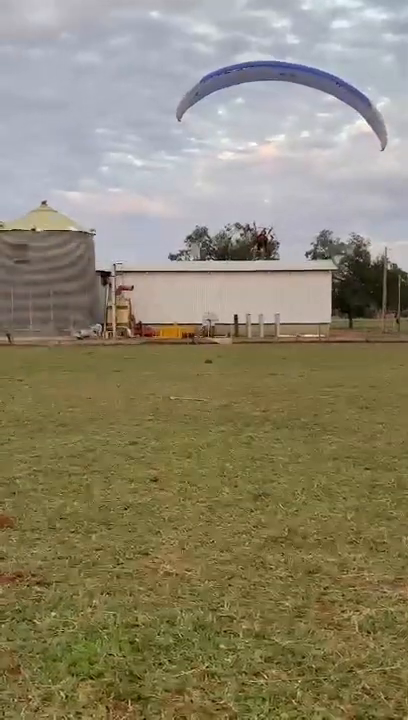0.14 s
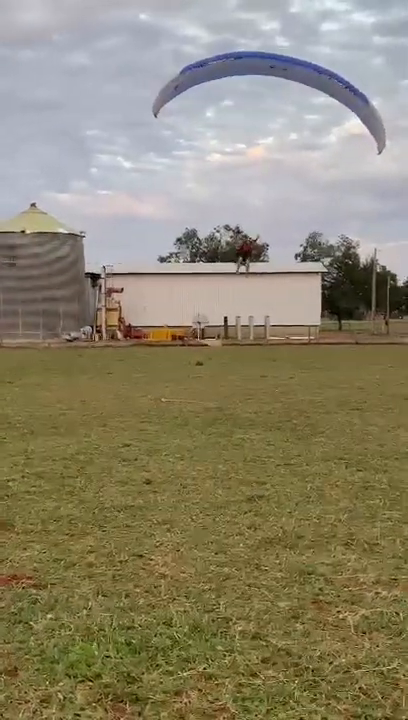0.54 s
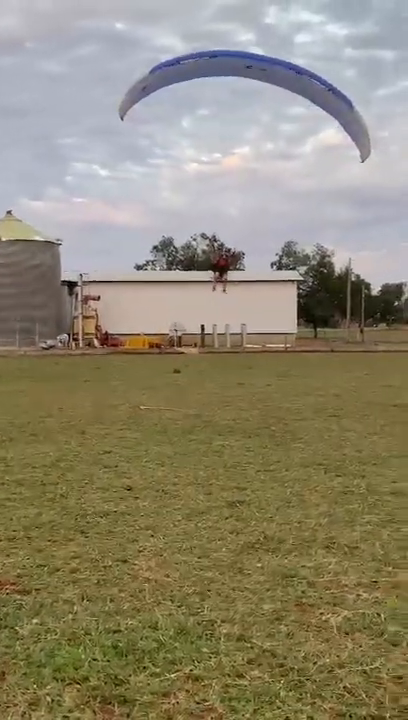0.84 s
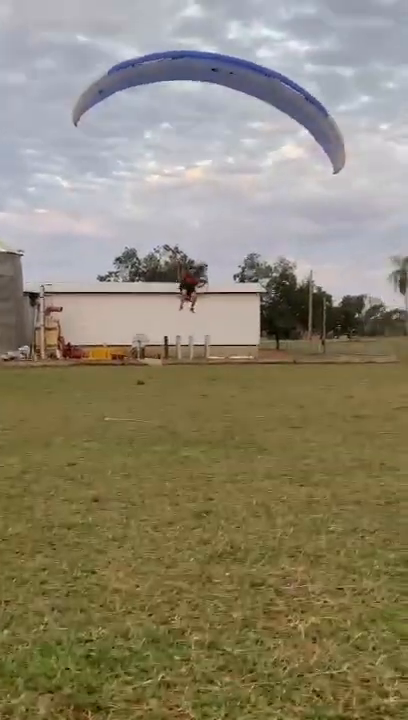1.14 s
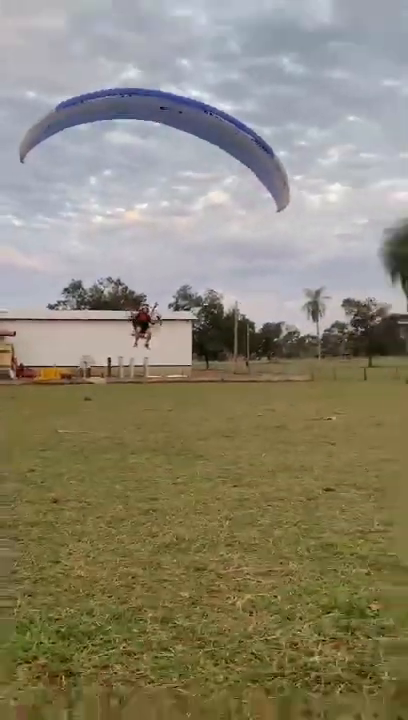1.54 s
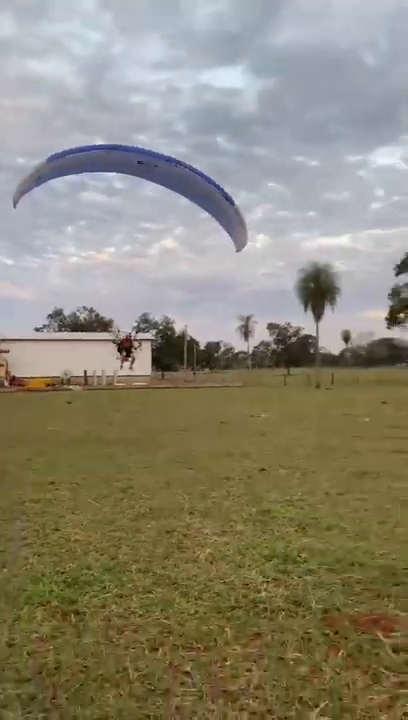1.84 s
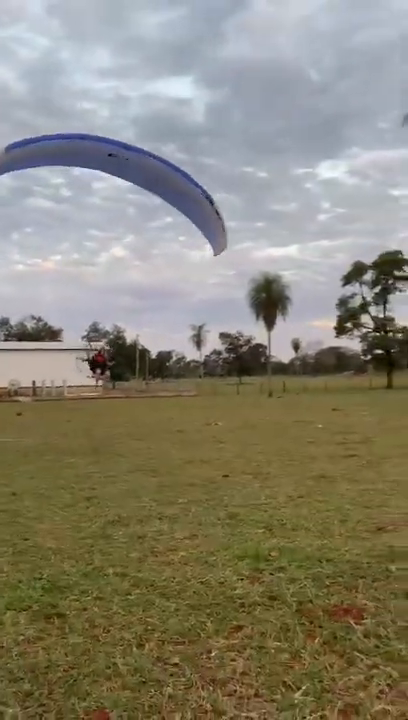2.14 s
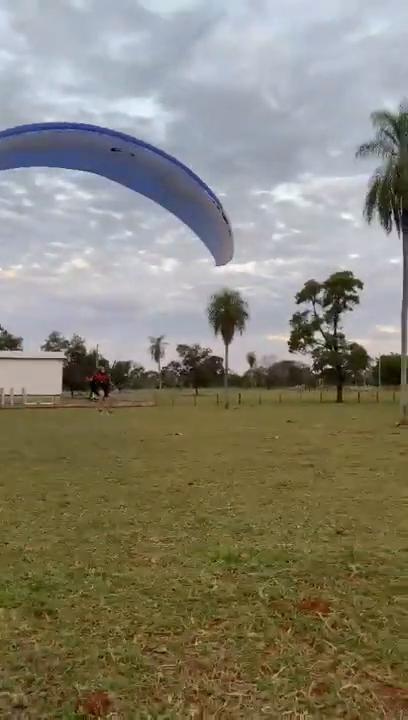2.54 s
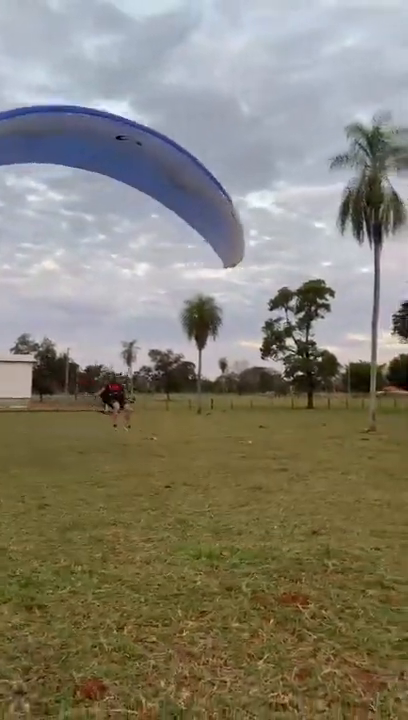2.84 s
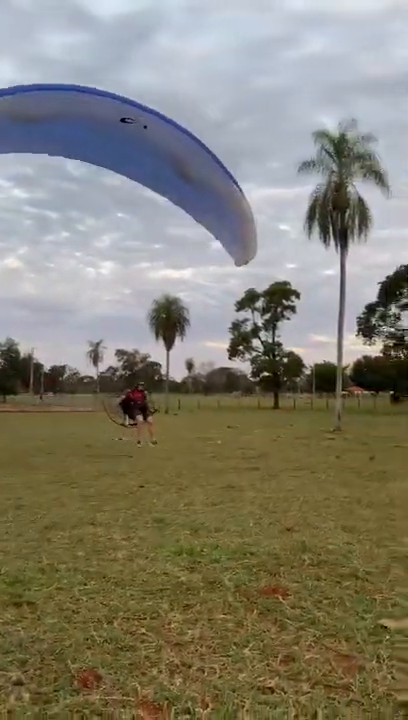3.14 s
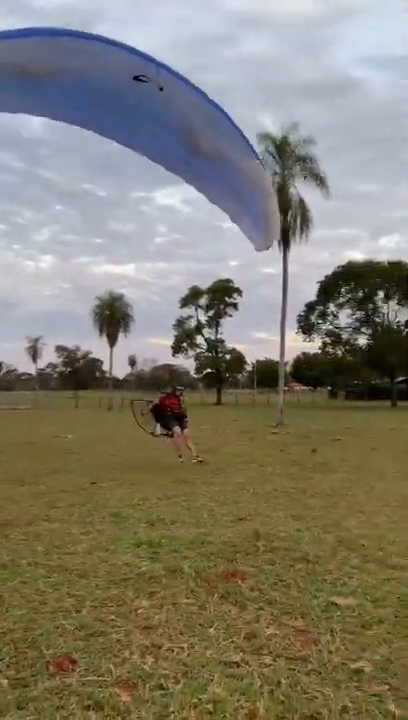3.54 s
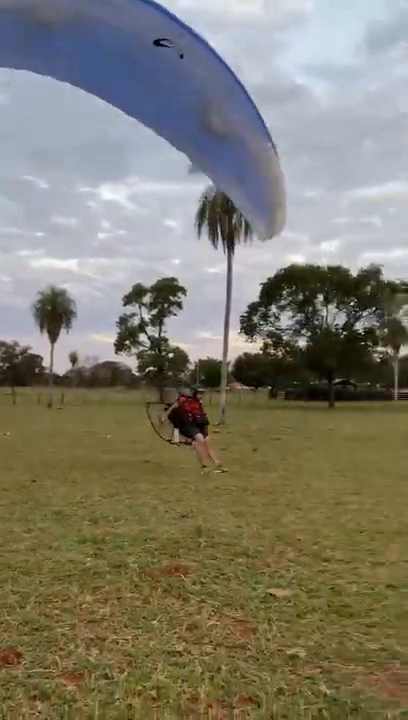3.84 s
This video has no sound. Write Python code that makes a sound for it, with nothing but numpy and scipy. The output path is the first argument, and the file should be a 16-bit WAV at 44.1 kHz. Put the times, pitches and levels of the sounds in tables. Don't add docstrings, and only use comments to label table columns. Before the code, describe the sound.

A paramotor's two-stroke engine, very faint at first, idles roughly over an open field, with low hums and irregular soft pops from 1 s. From 2 s a propeller whir climbs and wind puffs hiss. At 2.6 s the throttle catches in stuttering barks, becoming a loud, thumping buzz with small metallic jingles. A sharp pop hits at 3.2 s; then it rasps unevenly and slows, with airy rush and low buffeting, until 4 s. Phone stereo.

```python
import sys
import numpy as np
from scipy import signal
from scipy.fft import rfft, irfft, next_fast_len
from scipy.io import wavfile
from scipy.ndimage import uniform_filter1d, map_coordinates

SR = 44100
rng = np.random.default_rng(int(sys.argv[2]) if len(sys.argv) > 2 else 0)


def magnitude_from_level(level_db):
    exponent = np.asarray(level_db, float) / 20
    return 10 ** exponent


def log_audio(samples):
    frames = np.atleast_2d(samples).T
    limited = np.clip(frames, -1, 1)
    pcm = np.round(limited * 32767).astype(np.int16)
    wavfile.write(sys.argv[1], SR, pcm)


N = 176400

# start_s, nearness_db
NEAR = [(0, -72), (.75, -67), (1.3, -62.5), (2.0, -60), (2.5, -55.5), (2.62, -42), (2.75, -36.5),
        (2.83, -43.5), (3.15, -38.5), (3.24, -36.5), (3.34, -37), (3.5, -38.5), (3.6, -41), (3.75, -40),
        (4, -43)]
# centre_s, half_length_s, share_lost_db
LULL = [
    (2.67, .14, -2.5),
]


def unit(x):
    return x / np.sqrt(np.mean(x ** 2) + 1e-20)


def along(points, hz):
    f, v = np.transpose(points)
    return np.interp(np.log(hz + 1), np.log(f + 1), v)


def curves(rows):
    s, *cols = np.transpose(rows)
    return [np.interp(np.arange(N) / SR, s, c) for c in cols]


def wobble(rate_hz):
    knots = rng.standard_normal(int(N * rate_hz / SR) + 4)
    return map_coordinates(knots, [np.arange(N) * rate_hz / SR])


def swells(rows):
    t = np.arange(N) / SR
    return sum(magnitude_from_level(db) * np.exp(-((t - s) / half_s) ** 2) for s, half_s, db in rows)


def filtered(x, response):
    m = 2 * next_fast_len(N // 2 + 8192)
    return irfft(rfft(x, m) * response(np.fft.rfftfreq(m, 1 / SR)), m)[..., :N]


def causal(points):
    def response(hz):
        c = irfft(np.log(magnitude_from_level(along(points, hz))))
        c[1:len(hz) - 1] *= 2
        c[len(hz):] = 0
        return np.exp(rfft(c))
    return response


def ring(f, hz, wide_hz):
    return 1j * f * wide_hz / (hz * hz - f * f + 1j * f * wide_hz)


def rush(spectrum, patchy_db):
    z = signal.stft(rng.standard_normal(N), nperseg=512)[2]
    patches = uniform_filter1d(rng.standard_normal(z.shape), size=6, axis=0)
    patches = uniform_filter1d(patches, size=12, axis=1)
    x = signal.istft(z * magnitude_from_level(patchy_db * unit(patches)), nperseg=512)[1][:N]
    return unit(filtered(x, lambda hz: magnitude_from_level(along(spectrum, hz))))


def puff(x, length_s):
    envelope = signal.lfilter([1], [1, -np.exp(-1 / (length_s * SR))], x)
    return envelope * rng.standard_normal(N)


def closer_db():
    near_db, = curves(NEAR)
    return near_db - near_db[0]


def field_hiss():
    # hz, density_db
    spectrum = [(400, -13.5), (750, 3.5), (1150, -7.5), (1500, 0), (2000, -10), (3100, -10.5), (7000, -21),
                (11700, -33.5)]
    return magnitude_from_level(-60 + .38 * closer_db() + 1.73 * wobble(12)) * rush(spectrum, patchy_db=1.35)


def wash_rumble():
    # hz, density_db
    spectrum = [(25, -21), (45, -9.5), (65, -1), (90, -4.5), (125, -1), (190, -9.5), (310, -13.5),
                (400, -23), (600, -68.5)]
    # centre_s, half_length_s, over_rumble_db
    buffets = [
        (1.88, 0.061, -2),
        (3.84, 0.26, 4),
    ]
    level = magnitude_from_level(-46 + .29 * closer_db() + 1.2 * wobble(16))
    return level * (1 + swells(buffets)) * rush(spectrum, patchy_db=-0.3)


def wing_rush():
    # hz, density_db
    spectrum = [(540, -18), (700, -9.5), (1000, -3.5), (1270, -18), (1800, -10.5), (2600, -20.5),
                (5000, -24.5), (11700, -39)]
    near_db, = curves(NEAR)
    level = (1 - swells(LULL)) * magnitude_from_level(near_db - 6 + 2.1 * wobble(19))
    return level * rush([(300, -42.0)] + spectrum, patchy_db=-0.9)


def gusts():
    # centre_s, half_length_s, level_db
    gust_swells = [
        (.9, 0.092, -60),
        (1.62, 0.12, -62),
        (2.23, 0.079, -48.5),
        (2.38, 0.027, -50),
        (3.75, 0.033, -47),
    ]
    # hz, level_db
    spectrum = [(900, -33), (1600, 0), (2500, 5), (4000, -7), (7000, -8), (11500, -20.5)]
    return swells(gust_swells) * rush(spectrum, patchy_db=-3.0)


def fizz():
    # centre_s, half_length_s, level_db
    fizz_swells = [
        (2.54, 0.034, -66.5),
        (2.7, 0.23, -56.5),
        (3.08, 0.032, -56),
    ]
    # hz, density_db
    spectrum = [(3000, -27), (4500, -2), (6000, -6), (9500, -9.5), (11700, -13.5)]
    return swells(fizz_swells) * rush(spectrum, patchy_db=-1.5)


def jingle():
    # centre_s, half_length_s, level_db
    shakes = [
        (2.69, 0.019, -41),
        (2.82, 0.03, -44),
        (2.89, 0.026, -48),
        (3.1, 0.06, -48),
        (3.37, 0.072, -68),
        (3.46, 0.076, -54),
        (3.56, 0.11, -45.5),
        (3.85, 0.15, -54),
    ]
    shaking = rng.standard_normal(N) * magnitude_from_level(5.3 * wobble(100))
    pitch_hz, wide_hz = 7455, 513
    return swells(shakes) * unit(filtered(shaking, lambda f: ring(f, pitch_hz, wide_hz) ** 2))


def idle_drone():
    # pitch_hz, width_hz, level_db
    modes = [
        (64.1, 6.7, 3.5),
        (118.6, 7.3, 1.5),
        (154.3, 12.2, -1.5),
        (295.9, 19, -8),
    ]
    # start_s, level_db
    drone_level = [(0, -48), (.9, -52), (1.05, -41), (1.3, -51), (2, -46), (2.4, -45), (4, -67)]
    level_db, = curves(drone_level)
    frame = lambda f: sum(magnitude_from_level(db) * ring(f, hz, wide_hz) ** 2 for hz, wide_hz, db in modes)
    return magnitude_from_level(level_db) * unit(filtered(rng.standard_normal(N), frame))


def propeller():
    # start_s, blade_rate_hz, level_db
    spins = [
        [(1.98, 48.45, -35.5), (2.112, 60.25, -46), (2.32, 89.43, -39.5), (2.484, 115.1, -36),
         (2.572, 119, -40), (2.64, 125.3, -57)],
        [(3.06, 83.52, -37), (3.2, 92.65, -34), (3.28, 107.6, -39), (3.34, 109, -32), (3.44, 101.6, -36.5),
         (3.6, 95.66, -38.5), (3.72, 90, -41)],
    ]
    # multiple, level_db
    blades = [
        [(1, 2.5), (2, -13.5), (4, -46)],
        [(1, 1), (2, -2), (4, -8)],
    ]
    out, t, fade_s = 0, np.arange(N) / SR, 0.061
    for rows, orders in zip(spins, blades):
        hz, db = curves(rows)
        fade = np.clip(np.minimum(t - rows[0][0], rows[-1][0] - t) / fade_s, 0, 1)
        turn = 2 * np.pi * np.cumsum(hz) / SR
        for k, order_db in orders:
            level = np.sqrt(2) * magnitude_from_level(db + order_db + 1.5 * wobble(25))
            out = out + fade * level * np.sin(k * turn + .1 * k * wobble(30))
    return out


def pops():
    # start_s, peak_db
    stray = [(0.972, -41.5), (1.065, -38), (1.299, -46), (1.426, -44), (1.511, -36), (1.669, -39),
             (1.899, -41), (2.072, -39), (2.207, -41), (2.355, -37), (2.483, -39.5), (3.223, -17),
             (3.254, -38), (3.314, -41), (3.445, -39), (3.505, -30.5), (3.544, -37), (3.692, -50),
             (3.865, -45), (3.965, -27.5)]
    # start_s, peak_db
    catch = [
        (2.572, -34),
        (2.611, -30),
        (2.645, -29),
        (2.678, -28.5),
        (2.711, -27),
        (2.743, -29),
        (2.774, -32),
        (2.788, -36),
        (2.804, -35),
    ]
    # pitch_hz, width_hz, level_db
    near_modes = [
        (760, 260, -2),
        (980, 220, 5),
        (1750, 600, -13),
    ]
    # pitch_hz, width_hz, level_db
    far_modes = [
        (720, 170, 5),
        (1000, 200, -6),
        (1550, 300, -5),
    ]
    far_until_s, pipe_top_hz, catch_db = 2.15, 2560, 3
    blows = np.zeros(N)
    for s, db in stray + [(s, db + catch_db) for s, db in catch]:
        blows[round(s * SR)] = magnitude_from_level(db)

    def pipe(modes):
        def response(f):
            total = sum((-1) ** k * magnitude_from_level(db) * ring(f, hz, wide_hz) for k, (hz, wide_hz, db) in enumerate(modes))
            return total / (1 + 1j * f / pipe_top_hz) ** 2
        return response

    gas = blows + 0.03 * puff(blows, 0.004)
    far = np.arange(N) < far_until_s * SR
    crack = filtered(gas * far, pipe(far_modes)) + filtered(gas * ~far, pipe(near_modes))
    push_hz, push_wide_hz, push_db, level_db = 173, 230, 1, 2.5
    push = filtered(blows, lambda f: ring(f, push_hz, push_wide_hz) ** 2)
    return 20 * magnitude_from_level(level_db) * (crack + magnitude_from_level(push_db) * push)


def engine():
    # start_s, crank_turns_hz
    crank = [(0, 42), (1.05, 41), (1.3, 44.5), (1.5, 44.3), (1.9, 43.2), (2.16, 44.6), (2.4, 47),
             (2.56, 48), (2.63, 60), (2.72, 61.5), (2.88, 66.3), (3.05, 69.5), (3.28, 68.4), (3.35, 72),
             (3.52, 67), (3.7, 61), (4, 53.5)]
    # start_s, exhaust_thump_db, muffler_hum_db
    firing = [(0, -55.5, -63.5), (1.0, -54.5, -61), (1.2, -48, -51.5), (2.1, -46, -52.5), (2.55, -69, -48),
              (2.72, -35, -50.5), (2.8, -33, -49), (3.05, -32, -57), (3.27, -26, -43), (3.34, -38, -38.5),
              (3.7, -49, -40.5), (4, -56.5, -42.5)]
    # start_s, every_second_turn_weaker_0_to_1, size_scatter_db
    uneven = [(0, .2, 3), (1.0, .2, 3), (1.2, .05, 1.2), (2.5, .05, 1.2), (2.6, .8, 1), (2.74, .7, 1),
              (2.8, .03, .4), (3.15, .03, .4), (3.27, .3, .8), (3.33, .85, 1), (4, .85, 1.4)]
    # hz, level_db
    thump_spectrum = [(30, -35), (66, 0.5), (140, -9), (280, -18.5), (330, -19.5), (430, -30), (700, -61.5),
                      (1500, -85)]
    # hz, level_db
    bark_spectrum = [(420, -35), (680, -5), (990, 6), (1270, -15), (1800, -11), (2600, -17.5), (5000, -27),
                     (11500, -43)]
    # start_s, bark_under_load_db
    bark_opens = [(0, -6), (2.4, -5), (2.8, 0), (4, 0)]
    # pitch_hz, width_hz, level_db
    muffler_modes = [
        (221.5, 143, 1.5),
        (260, 42, -4.5),
        (298.9, 61.3, -1),
    ]
    # centre_s, half_length_s, level_db
    high_swell = [
        (3.76, 0.27, -46),
    ]
    (hz,), (near_db,), (load_db,) = curves(crank), curves(NEAR), curves(bark_opens)
    (thump_db, hum_db), (skip, scatter_db) = curves(firing), curves(uneven)
    turns = np.cumsum(hz / SR)

    at = np.flatnonzero(np.diff(np.floor(turns)))
    size_luck, time_luck = rng.standard_normal((2, len(at)))
    size = magnitude_from_level(scatter_db[at] * size_luck) * (1 - skip[at] * (np.arange(len(at)) % 2))
    jitter_turns = .005 * scatter_db[at] * time_luck
    at = np.clip(at + (jitter_turns * SR / hz[at]).astype(int), 0, N - 1)
    pulses = np.zeros(N)
    pulses[at] = size
    pulses /= np.sqrt(np.abs(uniform_filter1d(pulses ** 2, size=9000)) + 1e-9)

    thump = -magnitude_from_level(thump_db) * unit(filtered(pulses, causal(thump_spectrum)))
    muffler = lambda f: sum(magnitude_from_level(db) * ring(f, c, w) ** 2 * ring(f, c, 2 * w) for c, w, db in muffler_modes)
    hum = magnitude_from_level(hum_db) * unit(filtered(pulses, muffler))
    half_tone = magnitude_from_level(hum_db + 6 + 3.9 * wobble(21)) * skip ** 2 * np.sin(3.5 * 2 * np.pi * turns)
    high_tone = swells(high_swell) * magnitude_from_level(3.9 * wobble(12)) * np.sin(7.5 * 2 * np.pi * turns)

    gas = np.abs(pulses) ** .55
    smear_s, puff_s, gated = .012, .007, .35
    echoes = rng.standard_normal(2000) * np.exp(-np.arange(2000) / (smear_s * SR))
    smeared = unit(signal.fftconvolve(gas, echoes)[:N])
    bark = np.sqrt(1 - gated) * smeared + np.sqrt(gated) * unit(puff(gas, puff_s))
    bark = magnitude_from_level(near_db + load_db) * (1 - swells(LULL)) * unit(filtered(bark, causal(bark_spectrum)))
    return thump + hum + half_tone + high_tone + bark


def scattered(x):
    z = signal.stft(x, nperseg=512)[2]
    turn = np.exp(2j * np.pi * rng.random((z.shape[0], z.shape[1] // 4 + 1)))
    turn = turn.repeat(4, axis=1)[:, :z.shape[1]]
    return 1.565 * signal.istft(z * turn, nperseg=512)[1][:N]


def scene():
    # hz, left_leads_rad
    lead = [(40, .05), (150, .22), (500, 1.3), (1150, 2.2), (1700, 6.2), (2200, 7.6), (3000, 9.0),
            (12000, 12.5)]
    # hz, left_over_right_db
    tilt = [(60, -.5), (340, -2.8), (480, -1.5), (620, 8), (1400, 8), (2600, 1.5), (4400, -2), (6000, 0)]
    # hz, unrelated_share
    apart = [(60, .004), (330, .03), (560, .6), (950, .12), (1350, .8), (1850, .45), (2600, .9),
             (12000, .9)]
    sound = field_hiss() + wash_rumble() + wing_rush() + gusts() + fizz() + jingle()
    sound = sound + idle_drone() + propeller() + pops() + engine()
    left = filtered(sound, lambda hz: magnitude_from_level(along(tilt, hz) / 2))
    direct = filtered(sound, lambda hz: np.sqrt(1 - along(apart, hz)) * np.exp(-1j * along(lead, hz)))
    right = direct + scattered(filtered(sound, lambda hz: np.sqrt(along(apart, hz))))
    return np.array([left, filtered(right, lambda hz: magnitude_from_level(-along(tilt, hz) / 2))])


def thinned(x, limit, flicker=()):
    edge_hz, edge_rate_hz = 170, 16
    hz, t, z = signal.stft(x, SR, nperseg=1024)
    hz = hz[:512, None]
    power = np.abs(z[:512]).reshape(64, 8, -1) ** 2
    level = uniform_filter1d(power.mean(axis=1), size=3, axis=1).repeat(8, axis=0)
    low, high = edge_hz * rng.standard_normal((2, 200))[:, (t * edge_rate_hz).astype(int)]
    moved = hz + (hz > 5500) * (hz < 10000) * np.where(hz < 7500, low, high)
    gain = 1. * (level > magnitude_from_level(2 * along(limit, moved)))
    for start, end, lo, hi, db in flicker:
        gain[(hz > lo) & (hz < hi) & (t > start) & (t < end)] = magnitude_from_level(db)
    z[:512] *= gain
    return signal.istft(z, nperseg=1024)[1][:N]


def band_limit(x):
    return signal.sosfilt(signal.butter(12, 12000, fs=SR, output="sos"), x)


def record(dry):
    # hz, drop_below_db
    mid_limit = [(5700, -110), (6200, -92), (6700, -45), (8400, -45), (9000, -105), (11600, -109),
                 (11900, -60)]
    # hz, drop_below_db
    side_limit = [(1600, -100), (2200, -86), (3500, -82), (4500, -85), (5400, -73), (5900, -104),
                  (8200, -104), (9400, -76)]
    # start_s, end_s, low_hz, high_hz, gain_db
    flicker = [
        (2.305, 2.35, 6500, 8900, -9),
        (2.68, 2.72, 6400, 7200, -14),
        (3.095, 3.155, 8200, 8700, 0),
        (3.345, 3.37, 6400, 8300, -14),
        (3.37, 3.42, 6600, 12500, -90),
        (3.49, 3.6, 6800, 7150, -7),
        (3.65, 3.695, 6400, 7000, -8),
        (3.785, 3.812, 6400, 8900, -16),
        (3.835, 3.86, 6400, 8600, -14),
        (3.86, 3.9, 6600, 7000, -6),
    ]
    mid = thinned((dry[0] + dry[1]) / 2, mid_limit, flicker)
    side = thinned((dry[0] - dry[1]) / 2, side_limit)
    return band_limit(np.array([mid + side, mid - side]))


dry = scene()
out = record(dry)
log_audio(out)
```